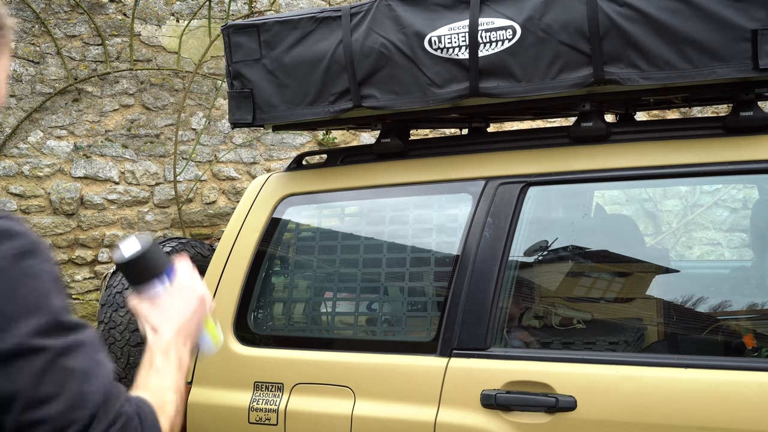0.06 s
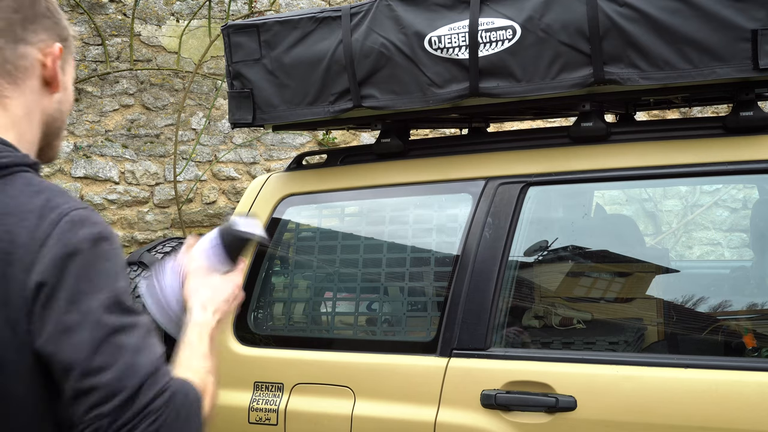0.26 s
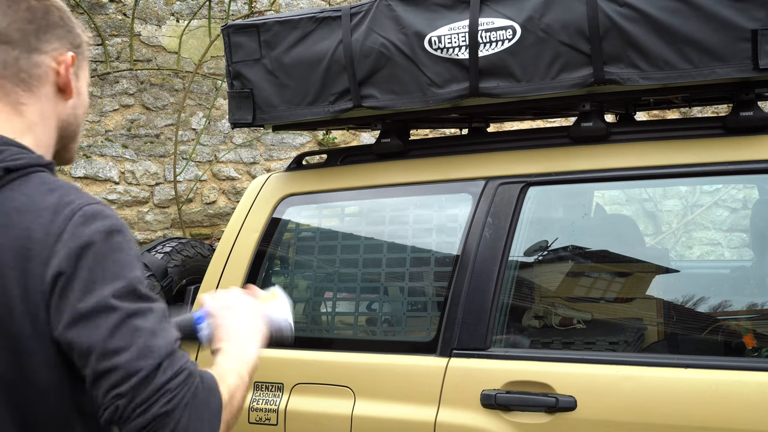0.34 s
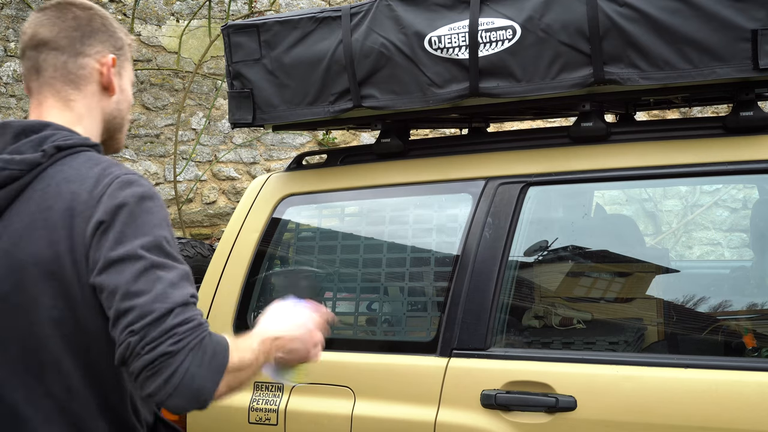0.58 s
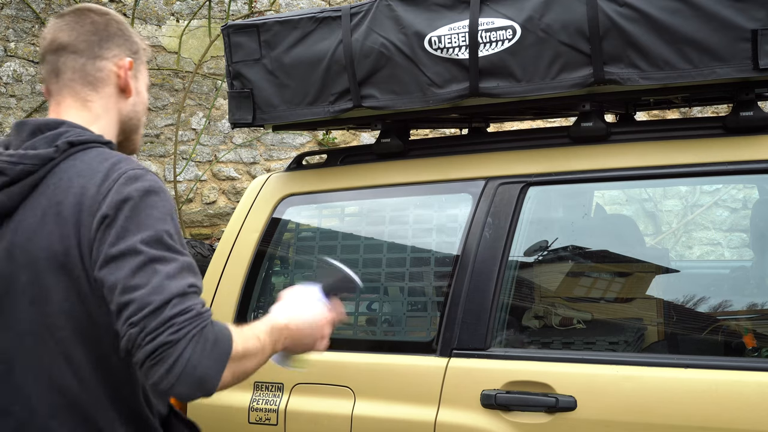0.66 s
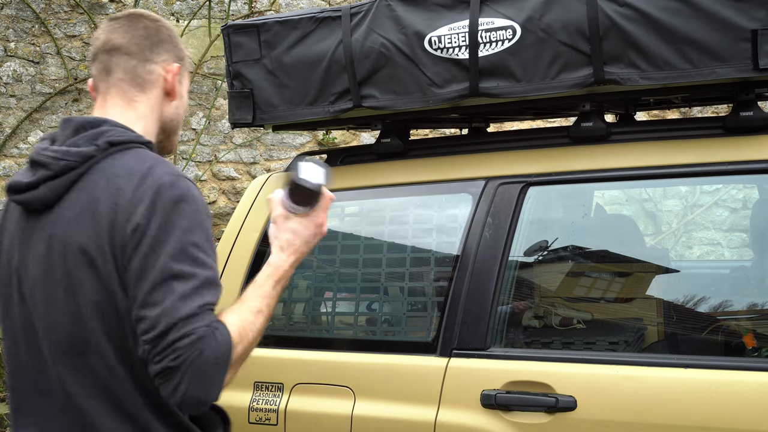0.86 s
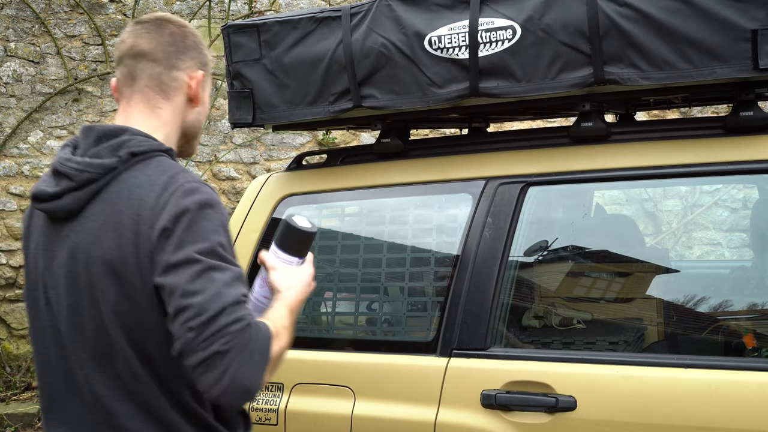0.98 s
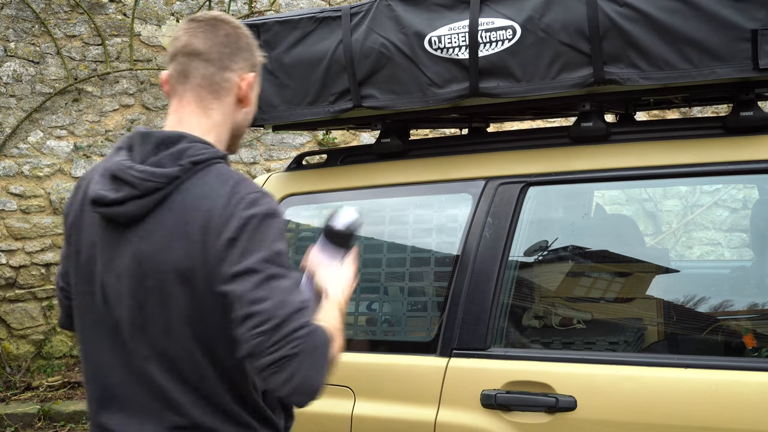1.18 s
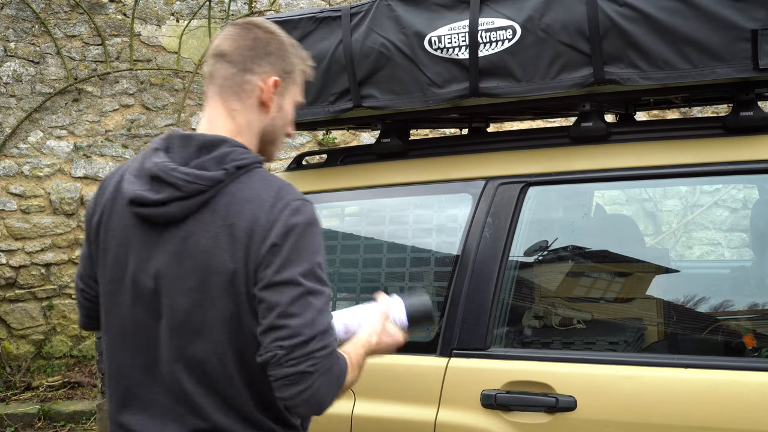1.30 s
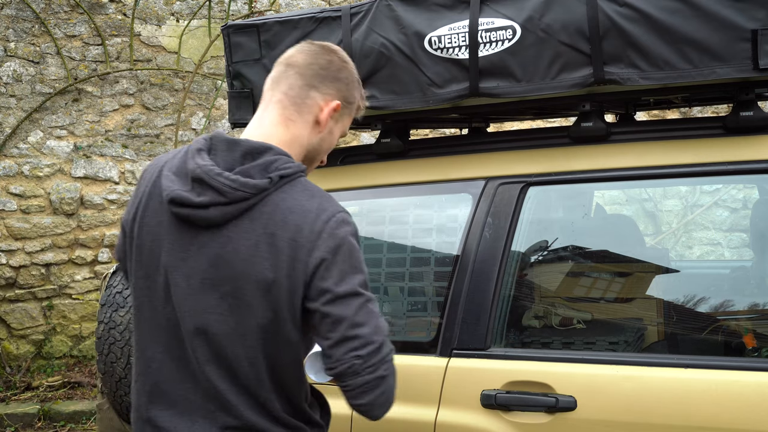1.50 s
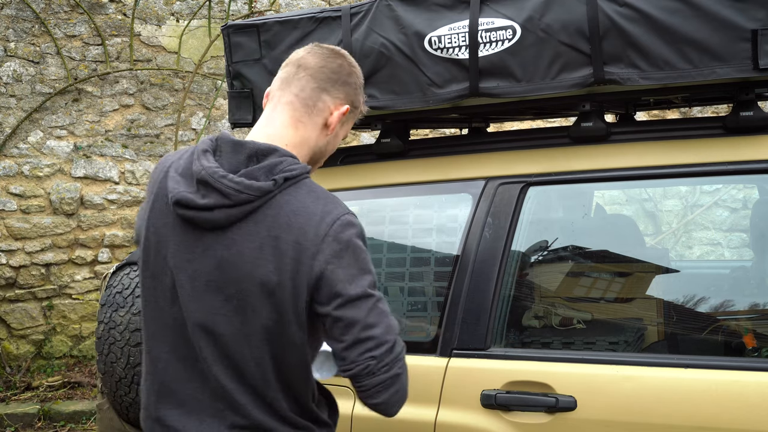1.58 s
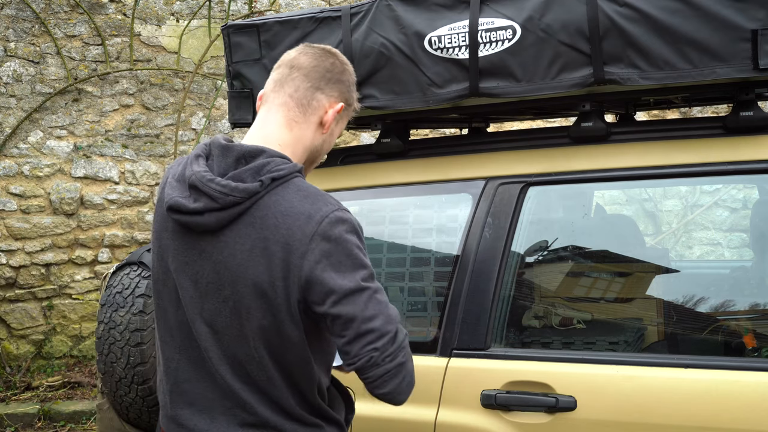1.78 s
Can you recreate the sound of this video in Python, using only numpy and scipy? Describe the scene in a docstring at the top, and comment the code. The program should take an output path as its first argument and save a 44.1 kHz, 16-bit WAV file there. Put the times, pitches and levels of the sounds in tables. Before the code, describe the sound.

Faint outdoor air and cloth swish, then a burst of fast, bright, hollow metallic clicks from a shaken spray can, thinning out before a dull low scuff; close, single-channel pickup in a stone-walled yard.

```python
"""Faint outdoor air and a sleeve's swish come first, then the quick, sharp clicks of a spray can shaken hard.
The can's mixing ball strikes its ends and wall: each blow sums a noise crack, damped steel modes and a hollow knock.
Each click bounces off the ground and dies away between stone walls, by convolution with noise.
Air and cloth are filtered noise; a soft scuff of noise with a small low thud follows at the end."""
import sys
import numpy as np
from scipy import signal
from scipy.fft import rfft, irfft
from scipy.io import wavfile
from scipy.ndimage import uniform_filter1d, map_coordinates

SR = 44100
rng = np.random.default_rng(int(sys.argv[2]) if len(sys.argv) > 2 else 0)


def generate_wav(sig):
    """Save sig (samples, or channels by samples) to the path in sys.argv[1] as 16-bit PCM at SR."""
    pcm = np.round(np.clip(np.atleast_2d(sig).T, -1, 1) * 32767).astype(np.int16)
    wavfile.write(sys.argv[1], SR, pcm)


N = 81585
T = np.arange(SR // 8) / SR  # time axis of one short sound, s
HZ = np.fft.rfftfreq(16384, 1 / SR)  # frequency axis of its filters


def amp(db):
    """Level law: decibels to amplitude gain."""
    return 10 ** (np.asarray(db) / 20)


def fade(t, t60):
    """Exponential damping: the level falls 60 dB in t60 seconds."""
    return np.exp(-np.log(1000) * t / t60)


def unit(x):
    """Energy normalization: the squared samples sum to 1."""
    return x / np.linalg.norm(x)


def along(points, hz):
    """Spectral envelope: (Hz, value) points joined by lines over log frequency."""
    point_hz, value = np.transpose(points)
    return np.interp(np.log(hz + 1), np.log(point_hz + 1), value)


def add(track, s, x):
    """Superposition: mix x into the track from time s in seconds."""
    part = track[max(0, round(s * SR)):][:len(x)]
    part += x[:len(part)]


def colour(x, db):
    """Minimum-phase filtering: folding the cepstrum makes the response db, given on HZ, causal."""
    cepstrum = irfft(db * np.log(10) / 20)
    half = len(cepstrum) // 2
    cepstrum[1:half] *= 2
    cepstrum[half + 1:] = 0
    response = np.exp(rfft(cepstrum))
    return irfft(rfft(x, len(cepstrum)) * response)[:len(x)]


def burst(t60, hold=0, size=220):
    """Transient noise: a damped puff, whitened by its own spectrum smoothed over size bins."""
    puff = rng.standard_normal(len(T)) * fade(np.maximum(T - hold, 0), t60)
    power = uniform_filter1d(abs(rfft(puff, 2 * len(HZ) - 2)) ** 2, size)
    whitening_db = -10 * np.log10(abs(power) + 1e-12)
    return unit(colour(puff, whitening_db))


def noise(spectrum):
    """Spectral shaping: steady Gaussian noise filtered to the given envelope, at rms 1."""
    gain = amp(along(spectrum, np.fft.rfftfreq(2 * N, 1 / SR)))
    x = irfft(rfft(rng.standard_normal(2 * N)) * gain)[:N]
    return x / x.std()


def mode(hz, t60, spread):
    """Modal vibration: one damped sine of energy 1, random in sign and detuned by a relative spread."""
    detuned_hz = hz * (1 + spread * rng.standard_normal())
    ringing = np.sin(2 * np.pi * detuned_hz * T) * fade(T, t60)
    return rng.choice([-1, 1]) * unit(ringing)


def air():
    """Ambient noise: steady random pressure, strongest in the bass."""
    # Each row: frequency in Hz, relative density in dB per Hz.
    air_spectrum = [(20, 4), (50, -0.5), (110, 1.5), (220, -3), (400, -6), (1000, -9), (2000, -8.5),
                    (5000, -41), (15000, -58)]
    return amp(-49) * noise(air_spectrum)


def sleeve():
    """Friction noise: cloth swishes as the arm moves, its level uneven with a fine random grain."""
    # Level contour of the swish. Each row: time in seconds, level in dB before trim and grain.
    swish_levels = [(0, -48), (.12, -50), (.26, -51), (.39, -44.5), (.6, -44.5), (.79, -57), (.97, -45.5),
                    (1.07, -61.5), (1.14, -44.5), (1.2, -49.5), (1.34, -60), (1.5, -52), (1.64, -65.5),
                    (1.71, -46.5), (1.727, -40), (1.759, -45.5), (1.81, -47.5), (1.85, -50.5)]
    # Each row: frequency in Hz, relative density in dB per Hz.
    swish_spectrum = [(200, -47), (700, 9), (1800, 3), (3000, 5), (5000, 2.5), (8500, 1), (10500, -9.5),
                      (14000, -8), (16500, -22)]
    trim_db, rough_db, grain_hz = -1, 2, 173.3
    s, db = np.transpose(swish_levels)
    t = np.arange(N) / SR
    grain = map_coordinates(rng.standard_normal(N), [t * grain_hz])  # smoothly joined random values
    level_db = trim_db + np.interp(t, s, db) + rough_db * grain
    return amp(level_db) * noise(swish_spectrum)


def crack(t60):
    """Impact noise: steel on steel gives a held, then dying burst plus a fainter chatter."""
    # Each row: frequency in Hz, relative density in dB per Hz.
    crack_spectrum = [(100, -45.5), (300, -31), (550, -16.5), (850, -7.5), (1200, -2.5), (1650, 1.5),
                      (2050, -1.5), (2700, -5), (3700, -4), (4500, -11), (5800, -10.5), (7000, -16),
                      (8100, -13), (9000, -13), (10300, -24.5), (12000, -23.5), (13400, -19), (15000, -26),
                      (16500, -51)]
    contact_s = 0.0012  # the burst holds this long before it dies
    chatter_db, chatter_t60_s = -10, 0.015
    raw = burst(t60, contact_s) + amp(chatter_db) * burst(chatter_t60_s)
    return unit(colour(raw, along(crack_spectrum, HZ)))


def shell_ring():
    """Modal superposition: the thin shell rings in damped modes, slightly different at each strike."""
    # Each row: nominal frequency in Hz, mean relative level in dB, t60 in seconds.
    can_modes = [(1005, -11.5, 0.036), (1415, -10, 0.052), (1534, -4.5, 0.039), (1710, -2.5, 0.037),
                 (1813, -7.5, 0.047), (1886, -17, 0.11), (2277, -7.5, 0.062), (3740, -15, 0.04),
                 (5960, -18, 0.022), (5850, -23, 0.025), (7720, -22, 0.017), (8890, -21.5, .025)]
    spread, scatter_db = 0.03, 0.5
    return sum(amp(db + rng.normal(0, scatter_db)) * mode(hz, t60, spread) for hz, db, t60 in can_modes)


def hollow_knock(hz):
    """Resonance: the can's hollow low note is one damped mode in a band filter."""
    t60_s, spread = 0.046, 0.0074
    band_db = along([(150, -43.5), (430, -2.5), (620, 3), (1200, -9)], HZ)
    return unit(colour(mode(hz, t60_s, spread), band_db))


def resonance_db(centre_hz, width_hz, lift_db):
    """Resonance curve: a Lorentzian lift in dB, at half its height width_hz from the centre."""
    return lift_db / (1 + ((HZ - centre_hz) / width_hz) ** 2)


def strike(crack_ms, knock_hz, shell_hz, zing_hz, knock_db, low_db, presence_db, treble_db):
    """Impact excitation: crack and shell ring keep one balance; tint and hollow knock level vary per strike."""
    crack_db, ring_db, knock_base_db = 1, -5.5, -14
    lift = resonance_db(shell_hz, 204, 8.5) + resonance_db(zing_hz, 300, 8.5)
    crack_t60 = max(crack_ms, 2) / 1000
    steel = amp(crack_db) * colour(crack(crack_t60), lift) + amp(ring_db) * shell_ring()
    # (Hz, dB); the treble value holds up to the top
    tint = [(300, 0), (700, low_db), (1000, low_db), (1350, 0), (2100, 0),
            (2800, presence_db), (4600, presence_db), (5400, treble_db)]
    return colour(steel, along(tint, HZ)) + amp(knock_base_db + knock_db) * hollow_knock(knock_hz)


def yard(x, onset_s=0.004):
    """Diffuse reverberation: convolution with a noise tail whose decay time depends on frequency."""
    # Decay between the stone walls. Each row: frequency in Hz, t60 in seconds.
    yard_decay = [(200, 0.18), (600, .3), (1700, 0.32), (4000, 0.26), (8000, 0.31), (15000, 0.19)]
    hz, t, grains = signal.stft(rng.standard_normal(SR // 2), SR, nperseg=256)
    decay = fade(t, along(yard_decay, hz)[:, None])
    onset = 1 - np.exp(-t / onset_s)
    tail = signal.istft(grains * decay * onset, SR, nperseg=256)[1]
    return signal.fftconvolve(x, unit(tail))


def echo(click, db, smear_s):
    """Diffuse reflection: a surface smears the click over a short noise burst with t60 smear_s."""
    return amp(db) * signal.fftconvolve(click, burst(smear_s))


def can():
    """Image sources: every strike is heard direct, then off the ground, the walls and the whole yard."""
    # Ball strikes. Each row: start in seconds, delay of the ground echo in ms, t60 of the crack in ms
    # (at least 2 is used), relative level in dB, nominal knock in Hz, favoured shell resonance in Hz,
    # favoured treble resonance in Hz, then relative dB of the hollow knock, low mids, presence, treble.
    strikes = [(0.064, 6.5, 2.8, -36, 546, 1720, 7840, 10.5, 1, 2, 1.5),
               (0.193, 6.0, 8.0, -40.5, 585, 1550, 7550.0, -3, 9, 7, -1),
               (0.2158, 6.0, 4, -21.0, 460, 1760, 7980, 9, -4.5, 3.0, 6.5),
               (0.285, 5.5, 9.2, -29, 577, 1860, 8100, -1.5, 1.5, -1, 5),
               (0.3277, 6.0, 11, -28.5, 580.0, 1860, 8800, -5.0, 4.5, 0, -2.5),
               (0.345, 5.0, 13, -29.5, 520, 1280.0, 8500, -11, 1, -5.5, -4.5),
               (0.427, 5.0, 16, -22, 511, 1900.0, 7800, 10.0, 8, 2, 3.5),
               (0.4734, 5.0, 8.4, -22, 512, 1550, 8300, 2, 2, 3.5, 2.5),
               (0.5542, 4.7, 4.2, -20.5, 516, 1780, 8540.0, -8.5, -5.5, 5, 4.5),
               (0.638, 5.0, 10, -42, 450, 1250, 5400, -3, 17, 1, 4),
               (0.6997, 5.0, 11, -23, 510.0, 1440, 7750.0, -0.5, 4, -1.5, 3),
               (0.7189, 4.8, 12.4, -25, 518, 1700, 7400, 11.0, 10.5, 7, 6.5),
               (0.7407, 5.0, 8.3, -31.5, 518, 1600, 8510.0, 10.5, 5.5, 3.5, 5.0),
               (0.782, 5.0, 35, -30, 550, 1530, 5800, -11, 9, 0.5, 0.5),
               (0.8618, 4.2, 18, -32.5, 486, 1460, 6020, 17, 8.5, 5, 13),
               (0.9177, 5.0, 3.2, -21, 502, 2300.0, 6850, 6, 0.5, 2, 4),
               (0.967, 4.5, 15, -27, 510.0, 1370, 8300, -13, 2.5, -5, -2.5),
               (1.103, 1.8, 7.3, -56, 450.0, 1370.0, 5610.0, -0.0, 18, -6.0, -4),
               (1.147, 4.0, 13, -39.5, 452, 1260, 5540, 9, 3, 1, 1),
               (1.182, 4.2, 1.8, -20, 507, 1840, 8400, 3, -5.5, 6.5, 3.5),
               (1.2274, 4.0, 15, -29.5, 443, 1600, 5500.0, -3, 5, -5, -2),
               (1.26, 4.0, 13, -38.5, 585, 1270, 5640.0, -11.0, 1, -6.0, -10),
               (1.2927, 4.0, 3.8, -23, 527, 1480, 6550, 6, -6, -2, -1.5),
               (1.32, 4.0, 10, -33, 535, 1630, 5900, 7, 6, 4, 1),
               (1.34, 4.0, 24, -34, 500.0, 1600, 5500.0, -27, 5.5, -26, -0.5),
               (1.396, 4.0, 22, -20, 467, 1450, 6450, 6, -3.5, -6, 3.5),
               (1.4118, 4.0, 6.3, -28, 530, 1550, 6600, 8.5, -26, -5.5, 0),
               (1.476, 3.0, 24, -28, 600, 1640, 5500.0, -8, 7.5, -2, -1),
               (1.54, 4.0, 10, -40.5, 605, 1410, 6160, 2, -20, -0.5, -2),
               (1.555, 4.0, 4.9, -33, 450, 1410, 5500.0, -21, -5, -17, -26),
               (1.6598, 4.0, 25, -33.0, 407, 1940.0, 5600, -1, 2.5, -5, -2)]
    # Each row: delay in seconds, level in dB relative to the click.
    wall_echoes = [(.0105, -17), (0.0163, -22.5), (0.0215, -29), (0.031, -19.5)]
    strike_db, ground_db, yard_db = 24, -5.5, -11
    ground_smear_s, wall_smear_s = 0.0081, 0.0084
    out = np.zeros(N)
    for s, echo_ms, crack_ms, db, *tone in strikes:
        click = amp(strike_db + db) * strike(crack_ms, *tone)
        add(out, s, click)
        add(out, s + echo_ms / 1000, echo(click, ground_db, ground_smear_s))
        for delay, echo_db in wall_echoes:
            add(out, s + delay, echo(click, echo_db, wall_smear_s))
        add(out, s, amp(yard_db) * yard(click))
    return out


def scuff():
    """Friction and impact: a soft dull scuff of noise, probably a shoe, with one damped low mode as its thud."""
    # Each row: frequency in Hz, relative density in dB per Hz.
    scuff_spectrum = [(80, -29), (240, -3), (400, -7), (700, 4.5), (1000, 1), (1500, -7.5), (3000, -21),
                      (10000, -26)]
    start_s, attack_s, hold_s, t60_s, scuff_db = 1.774, 0.0065, 0.042, 0.22, -40
    thud_hz, thud_t60_s, thud_db = 255, 0.042, -15.5  # the weight behind the scuff
    t = np.arange(N) / SR - start_s
    attack = np.clip(t / attack_s, 0, 1)
    shape = attack * fade(np.maximum(t - hold_s, 0), t60_s)
    out = amp(scuff_db) * shape * noise(scuff_spectrum)
    add(out, start_s, amp(thud_db) * mode(thud_hz, thud_t60_s, spread=0.016))
    return out


def scene():
    """Superposition: air, sleeve, can and scuff sum in one channel."""
    return (air() + sleeve() + can() + scuff())[None]


def record(dry):
    """Clipping and band limiting: samples stop at full scale, then nothing passes above top_hz."""
    top_hz = 16400
    hz = np.fft.rfftfreq(2 * N, 1 / SR)
    clipped = np.clip(dry, -1, 1)
    return irfft(rfft(clipped, 2 * N) * (hz < top_hz))[:, :N]


dry = scene()
out = record(dry)
generate_wav(out)
```